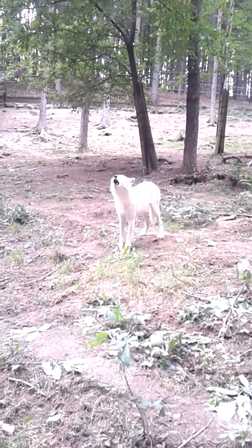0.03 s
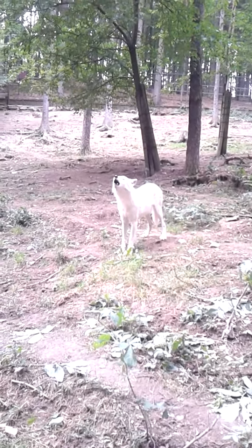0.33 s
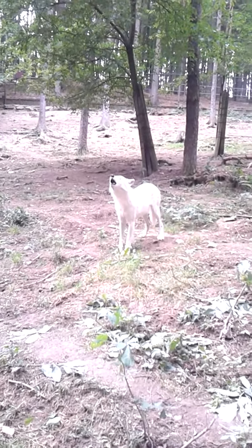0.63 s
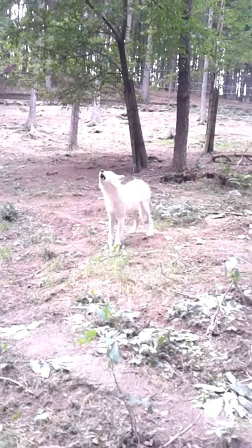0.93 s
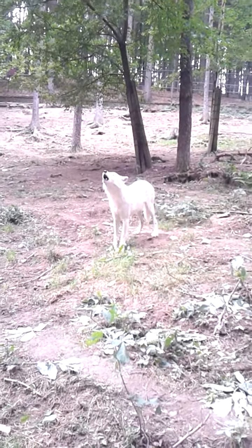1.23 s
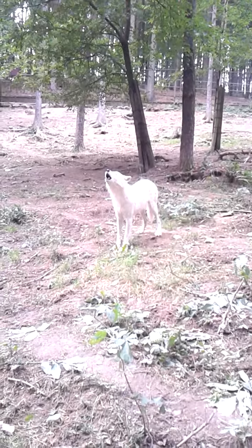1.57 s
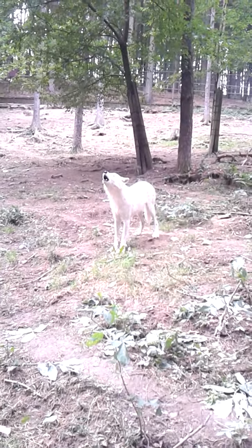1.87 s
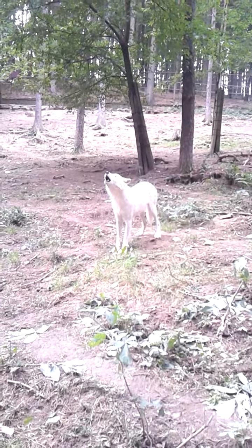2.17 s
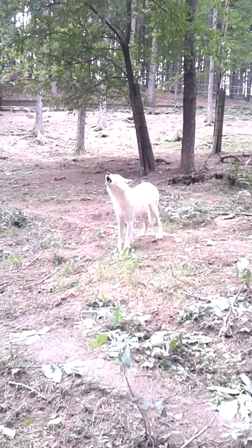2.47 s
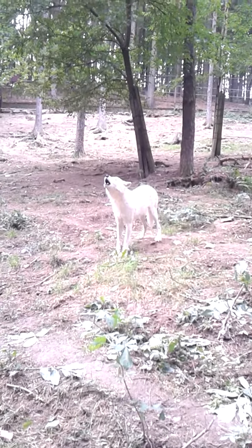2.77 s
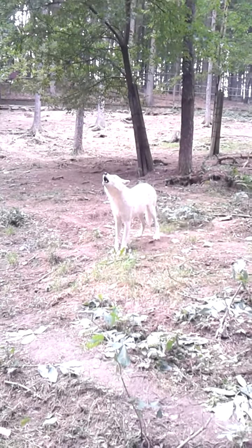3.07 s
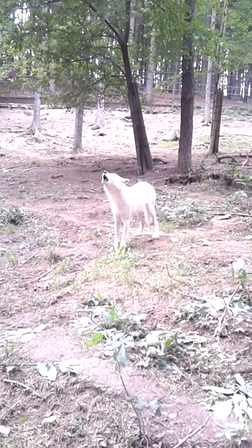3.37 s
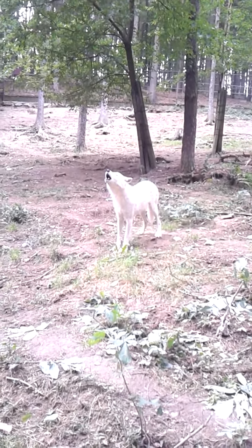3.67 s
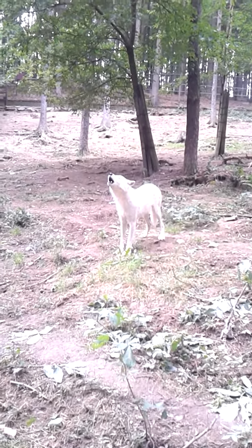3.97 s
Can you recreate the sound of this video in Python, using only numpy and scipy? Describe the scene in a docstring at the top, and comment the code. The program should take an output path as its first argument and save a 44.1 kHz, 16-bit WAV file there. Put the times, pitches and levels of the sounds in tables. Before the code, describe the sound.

A nearby wolf holds a long howl while several others join in among the trees.

```python
"""A near wolf howls one long, almost pure note in a wooded enclosure. A second joins twice just above it,
so that the two beat; a third arches higher and farther off; a fourth moans low; a fifth is barely heard.
Each voice is a set of larynx harmonics shaped by the throat, with an echo from the trees.
Thin squeaks, a whistle and a few ticks pass over quiet outdoor air, a rustle and an electronic whine."""
import sys
import numpy as np
from scipy import signal
from scipy.fft import rfft, irfft, next_fast_len
from scipy.io import wavfile
from scipy.ndimage import uniform_filter1d, map_coordinates

SR = 44100
rng = np.random.default_rng(int(sys.argv[2]) if len(sys.argv) > 2 else 0)


def to_wav(sig):
    """Store sig (one row per channel, or 1-D mono) as 16-bit WAV at the path in sys.argv[1].

    Samples outside -1..1 are clipped; the rate is SR.
    """
    pcm = np.clip(np.atleast_2d(sig), -1, 1) * 32767
    pcm = np.round(pcm).astype(np.int16)
    wavfile.write(sys.argv[1], SR, pcm.T)  # frames by channels


N = 176400
TIME_S = np.arange(N) / SR


def amp(db):
    """Decibels to gain."""
    return 10 ** (np.asarray(db) / 20)


def unit_rms(x):
    """Scale to rms 1."""
    return x / np.sqrt(np.mean(x ** 2) + 1e-20)


def at_hz(points, hz):
    """Interpolate (freq_hz, value) points on a log frequency axis."""
    freqs_hz, values = np.transpose(points)
    return np.interp(np.log(hz + 1), np.log(freqs_hz + 1), values)


def curves(rows):
    """One per-sample curve for each column after time_s."""
    times_s, *columns = np.transpose(rows)
    return [np.interp(TIME_S, times_s, column) for column in columns]


def wobble(rate_hz):
    """Smooth random curve, rate_hz knots a second."""
    grid = np.arange(0, N + 64, 64)
    knots = rng.standard_normal(int(N * rate_hz / SR) + 4)
    return np.interp(np.arange(N), grid, map_coordinates(knots, [grid * rate_hz / SR]))


def noise(spectrum):
    """Coloured noise of rms 1."""
    size = next_fast_len(N + SR // 2)
    white = rfft(rng.standard_normal(N), size)
    gain = amp(at_hz(spectrum, np.fft.rfftfreq(size, 1 / SR)))
    return unit_rms(irfft(white * gain, size)[:N])


def patchy(x, depth_db):
    """Patches of treble swell and fade independently; output rms 1."""
    hz, _, bins = signal.stft(x, SR, nperseg=512)
    patches = uniform_filter1d(rng.standard_normal(bins.shape), size=9, axis=0)
    patches = unit_rms(uniform_filter1d(patches, size=16, axis=1))
    treble_weight = np.clip(hz / 5000, 0, 1)[:, None]
    bins *= amp(depth_db * treble_weight * patches)
    return unit_rms(signal.istft(bins, SR, nperseg=512)[1][:N])


# freq_hz, relative_db
AIR_SPECTRUM = [(20, -13.5), (75, 0), (130, -9.5), (300, -6), (560, 0), (1100, -12), (1700, -19),
                (2800, -29), (4500, -16), (6200, -20), (7500, -35.5), (10000, -25), (11000, -38.5)]


def outdoor_air(level_db=-52.5):
    """Quiet, slightly wavering rush."""
    return amp(level_db + 1.6 * wobble(22)) * patchy(noise(AIR_SPECTRUM), depth_db=1.3)


# time_s, level_db
RUSTLE_ENVELOPE = [(0, -66.5), (.8, -57), (1.5, -55), (1.9, -54.5), (2.1, -52), (2.5, -49), (2.85, -50.5),
                   (3.1, -68), (4, -70.5)]
# freq_hz, relative_db
RUSTLE_SPECTRUM = [(90, -10), (170, -8.5), (500, 5), (1000, -0.5), (1650, -3.5), (2200, -6), (3000, -24),
                   (8000, -19), (12000, -44.5)]


def rustle():
    """Soft midrange noise that swells midway."""
    level_db, = curves(RUSTLE_ENVELOPE)
    return amp(level_db + 2.1 * wobble(16)) * noise(RUSTLE_SPECTRUM)


# start_s, level_db
TICK_ONSETS = [(.185, -51), (1.482, -52), (2.175, -52), (2.785, -51)]
# freq_hz, relative_db
TICK_SPECTRUM = [(500, -20), (3000, -3), (5500, 2), (10000, -6.5), (12500, -24)]


def ticks(t60_s=0.045):
    """Dry, decaying noise bursts, perhaps twigs."""
    envelope = np.zeros(N)
    for start_s, level_db in TICK_ONSETS:
        age_s = TIME_S - start_s
        envelope += (age_s >= 0) * amp(level_db - 60 * np.abs(age_s) / t60_s)
    return envelope * noise(TICK_SPECTRUM)


# freq_hz, t60_s
WOODS_DECAY = [(200, 0.98), (600, 1.35), (2000, 0.75), (10000, 0.23)]


def in_woods(x, wet_db):
    """A sound plus its diffuse echo from the trees."""
    hz, time_s, bins = signal.stft(rng.standard_normal(SR), SR, nperseg=256)
    decay = amp(-60 * time_s / at_hz(WOODS_DECAY, hz)[:, None])
    tail = signal.istft(bins * decay, SR, nperseg=256)[1]
    return x + amp(wet_db) * signal.fftconvolve(x, tail / np.linalg.norm(tail))[:N]


# start_s, length_s, first_hz, middle_hz, last_hz, level_db
SQUEAK_GLIDES = [(2.0, .2, 1690, 1680, 1650, -57), (2.07, .16, 6900, 8300, 7900, -69),
                 (2.32, .14, 6700, 8100, 8400, -69), (2.85, .15, 7700, 8200, 6800, -70),
                 (3.06, .11, 4100, 3700, 2800, -63), (3.27, .1, 5600, 5450, 5300, -64),
                 (3.55, .17, 8100, 7700, 6500, -69), (3.79, .07, 4900, 4200, 3000, -63)]


def squeaks(jitter_cycles=0.45):
    """Thin gliding tones, made raspy by fast phase jitter."""
    out = np.zeros(N)
    for start_s, length_s, *glide_hz, level_db in SQUEAK_GLIDES:
        progress = np.clip((TIME_S - start_s) / length_s, 0, 1)
        pitch_hz = np.polyval(np.polyfit([0, .5, 1], glide_hz, 2), progress)
        cycles = np.cumsum(pitch_hz) / SR + jitter_cycles * wobble(250)
        envelope = amp(level_db) * np.abs(np.sin(np.pi * progress)) ** 0.062
        out += np.sqrt(2) * envelope * np.sin(2 * np.pi * cycles)
    return in_woods(out, wet_db=-2)


def voice(pitch_hz, harmonics_db, jitter_cycles, flutter_db=1.5, flutter_hz=45, swell_hz=11):
    """Harmonics of an unsteady larynx; each overtone also wavers alone, the high ones most."""
    phase = 2 * np.pi * (np.cumsum(pitch_hz) / SR + jitter_cycles * (wobble(22) + .33 * wobble(90)))
    out = amp(harmonics_db[0]) * np.sin(phase)
    for k, level_db in enumerate(harmonics_db[1:], 2):
        depth_db = 2.1 * min((k - 1) / 7, 1)
        waver_db = depth_db * (wobble(flutter_hz) + wobble(swell_hz))
        out += amp(level_db + waver_db) * np.sin(k * phase)
    return np.sqrt(2) * out * amp(flutter_db * wobble(flutter_hz))


# time_s, pitch_hz, level_db
WHISTLE_CONTOUR = [(.83, 3120, -57), (0.929, 3230, -59.5), (0.981, 3060, -62.5), (1.05, 3190, -52.5),
                   (1.29, 3146, -60.5), (1.36, 3100, -71)]


def whistle(ramp_s=0.0099):
    """Thin tone that starts just before the second wolf's first howl and rides on it."""
    pitch_hz, level_db = curves(WHISTLE_CONTOUR)
    start_s, end_s = WHISTLE_CONTOUR[0][0], WHISTLE_CONTOUR[-1][0]
    gate = np.clip(np.minimum(TIME_S - start_s, end_s - TIME_S) / ramp_s, 0, 1)
    return in_woods(gate * voice(pitch_hz, [level_db], jitter_cycles=.044), wet_db=-16)


def howl(contour, throat, harmonics, jitter_cycles, wet_db, ramp_s=0.0099):
    """One call: a gliding fundamental with overtones shaped by the throat, plus echo."""
    pitch_hz, level_db, overtone_db = curves(contour)
    start_s, end_s = contour[0][0], contour[-1][0]
    attack = np.clip((TIME_S - start_s) / ramp_s, 0, 1)
    release = np.clip((end_s - TIME_S) / ramp_s + 2, 0, 1)
    upper_db = [level_db + overtone_db + at_hz(throat, k * pitch_hz) for k in range(2, harmonics + 1)]
    tone = voice(pitch_hz * (TIME_S >= start_s), [level_db] + upper_db, jitter_cycles)
    return in_woods(attack * release * tone, wet_db)


# time_s, pitch_hz, level_db, overtone_gain_db
FAR_ARCH = [(1.57, 355, -55, 9), (1.72, 399.6, -47.5, 4), (1.79, 470.5, -51, 14), (1.87, 588, -41, 2),
            (2.0, 619, -37, 0), (2.15, 655, -32.5, -3), (2.3, 674, -33.5, -4), (2.48, 678, -32, -1),
            (2.6, 662, -33.5, -4), (2.8, 648, -36, -3), (2.93, 630, -33, -3), (3.3, 616, -43, 6),
            (3.5, 601, -34, -6), (3.68, 585, -41.5, 3), (4.0, 571, -38, -10)]
FAINT_CALL = [(0, 404, -57, -14), (.3, 436.5, -61, -10), (.85, 412.6, -57, -8.5)]
# freq_hz, gain_db
FAR_FORMANTS = [(750, -15), (1200, -17), (1350, -34), (1800, -47.5), (2400, -35.5), (2800, -42.5),
                (3350, -34.5), (4200, -55.5)]


def far_wolves():
    """One wolf arches high; another is barely heard, half of it echo."""
    arch = howl(FAR_ARCH, FAR_FORMANTS, harmonics=7, jitter_cycles=.044, wet_db=-10)
    faint = howl(FAINT_CALL, FAR_FORMANTS, harmonics=3, jitter_cycles=.088, wet_db=0)
    return arch + faint


# time_s, pitch_hz, level_db, overtone_gain_db
EARLY_MOAN = [(0, 309.6, -41.5, 6.5), (.17, 319.4, -37.5, -1.5), (.37, 322.4, -42.5, 3), (.6, 318, -40, -7),
              (.73, 308.2, -37.5, -10), (.87, 284.4, -39, -28), (1.02, 259, -56, -10),
              (1.12, 245, -71.5, -13)]
FALLING_GROAN = [(.8, 280, -54, -22.5), (.92, 168, -57, -29), (1.02, 125, -63, -23)]
LATE_MOAN = [(3.11, 300, -53, -1), (3.2, 340.8, -45, 0), (3.28, 333, -44, -5), (3.4, 294, -41, -10),
             (3.52, 299.6, -46.5, -7), (3.63, 308.2, -47, -4.5), (4.0, 303.4, -44, -7.5)]
# freq_hz, gain_db
LOW_FORMANTS = [(630, -1.5), (960, -4), (1280, -21.5), (1600, -30.5), (1930, -31), (2400, -37),
                (4000, -39.5)]


def low_wolf():
    """Two moans; a short groan drops away under the first."""
    return sum(howl(contour, LOW_FORMANTS, harmonics=10, jitter_cycles=.032, wet_db=-16)
               for contour in (EARLY_MOAN, FALLING_GROAN, LATE_MOAN))


# time_s, pitch_hz, level_db, overtone_gain_db
EARLY_HOWL = [(.88, 548, -36, -7), (.91, 538.4, -30.5, 0.5), (.97, 510.6, -29.5, 6),
              (1.05, 527.6, -30, 4.5), (1.28, 524.4, -31.5, 5.5), (1.32, 516, -28.5, 0.5),
              (1.37, 509.3, -31, -10), (1.52, 505.9, -30.5, -17), (1.72, 491.3, -37, -6.5),
              (1.79, 456, -30.5, -14.5), (1.85, 340, -53, -5), (1.95, 173.6, -53, -19)]
LATE_HOWL = [(3.03, 452.4, -36.5, -8), (3.08, 470.8, -43, -6.5), (3.12, 500.2, -32.5, -3),
             (3.17, 514.5, -29, -9), (3.35, 518.4, -31.5, 3), (3.55, 529, -30.5, 2), (3.68, 515, -38, 9.5),
             (4.0, 504, -37.5, -3.5)]
# freq_hz, gain_db
EARLY_FORMANTS = [(650, -1), (900, 4), (1020, -32.5), (1570, -20.5), (2100, -31.5), (2620, -51.5),
                  (3700, -53), (4200, -42.5), (4900, -40), (5700, -42.5), (7000, -49.5)]
LATE_FORMANTS = [(1040, -18.5), (1550, -51), (2080, -44.5), (2600, -59.5), (3600, -39), (4150, -35),
                 (4680, -31), (5200, -51.5), (7500, -57.5)]


def second_wolf():
    """Two howls just above the near wolf's pitch, beating against it."""
    return sum(howl(contour, throat, harmonics=14, jitter_cycles=.016, wet_db=-16)
               for contour, throat in ((EARLY_HOWL, EARLY_FORMANTS), (LATE_HOWL, LATE_FORMANTS)))


# time_s, pitch_hz
NEAR_CONTOUR = [(0, 547.2), (0.28, 549.4), (0.42, 539.1), (0.58, 525.0), (0.67, 510.8), (0.9, 496.3),
                (1.1, 491.9), (1.43, 488.7), (1.56, 492.5), (1.72, 485.2), (2.05, 480.1), (2.33, 476.5),
                (2.44, 472.3), (2.55, 476.9), (2.67, 471.8), (2.95, 480.1), (3.19, 493.0), (3.48, 500.2),
                (3.78, 494.2), (4, 486.1)]
# time_s, harmonic1_db, harmonic2_db, harmonic3_db, harmonic4_db, harmonic5_db, treble_gain_db
NEAR_HARMONICS = [(0, -26, -39, -57, -63, -79, -2), (.25, -26, -37, -48.5, -56.5, -78, -1.5),
                  (.42, -23.5, -44, -63.5, -59, -72, 0.5), (.6, -24.5, -45, -71.5, -57.5, -88, -4),
                  (.7, -26, -41.5, -64, -64.5, -81, -1), (.95, -25, -44, -56, -47, -83.5, -3.5),
                  (1.3, -24.5, -46.5, -55, -47, -71.5, -4.5), (1.65, -23, -43.5, -54.5, -47, -75, 1),
                  (2.05, -26.5, -61.5, -50, -49.5, -65.5, -1.5), (2.35, -27, -48, -50.5, -53, -71, -3),
                  (2.58, -27, -48, -49, -55, -67, -5), (2.72, -23.5, -49.5, -48.5, -55.5, -70, -4.5),
                  (2.9, -27.5, -54, -48, -51, -61, -5.5), (3.1, -22, -46, -47.5, -49, -61.5, -0.5),
                  (3.4, -22, -35.5, -50.5, -58.5, -61.5, -3), (3.7, -22, -36.5, -49, -55.5, -61, 3.5),
                  (4, -22.5, -49.5, -47.5, -53, -57.5, -0.5)]
# Above harmonic 5: freq_hz, level_db
OPEN_FORMANTS = [(3150, -73), (3300, -82), (3700, -64.5), (3900, -69.5), (4200, -48.5), (4400, -82),
                 (4750, -53.5), (4950, -63.5), (5300, -53.5), (5500, -56), (5850, -59), (6050, -88.5),
                 (7400, -71.5), (8800, -92), (9900, -62), (10600, -70.5), (11500, -89)]
NARROW_FORMANTS = [(2830, -63), (2930, -95), (3060, -69), (3290, -68.5), (3350, -57.5), (3480, -63.5),
                   (3620, -54), (3800, -86.5), (4050, -82.5), (4300, -67.5), (4500, -69), (4720, -61.5),
                   (4950, -63.5), (5100, -78.5), (5400, -65), (5900, -68.5), (6400, -72.5), (8800, -101),
                   (9500, -71), (10200, -75), (11500, -92.5)]


def near_wolf(narrows_at_s=0.63, narrowing_s=0.031):
    """Long clean note; faint high harmonics cross throat resonances that shift as the mouth narrows."""
    pitch_hz, = curves(NEAR_CONTOUR)
    *harmonics_db, treble_db = curves(NEAR_HARMONICS)
    openness = np.clip((narrows_at_s - TIME_S) / narrowing_s + .5, 0, 1)
    for k in range(6, 23):
        open_db = at_hz(OPEN_FORMANTS, k * pitch_hz)
        narrow_db = at_hz(NARROW_FORMANTS, k * pitch_hz)
        harmonics_db.append(treble_db + openness * open_db + (1 - openness) * narrow_db)
    return in_woods(voice(pitch_hz, harmonics_db, jitter_cycles=.016, flutter_db=.3), wet_db=-27)


def scene():
    """The chorus over the background, mono."""
    wolves = near_wolf() + second_wolf() + far_wolves() + low_wolf()
    return (wolves + whistle() + squeaks() + ticks() + outdoor_air() + rustle())[None]


def record(dry, whine_hz=11990, whine_db=-69, cutoff_hz=13100):
    """Faint electronic whine, then a steep low-pass."""
    whine = np.sqrt(2) * amp(whine_db) * np.sin(2 * np.pi * whine_hz * TIME_S)
    return signal.sosfilt(signal.butter(16, cutoff_hz, fs=SR, output="sos"), dry + whine)


dry = scene()
out = record(dry)
to_wav(out)
```